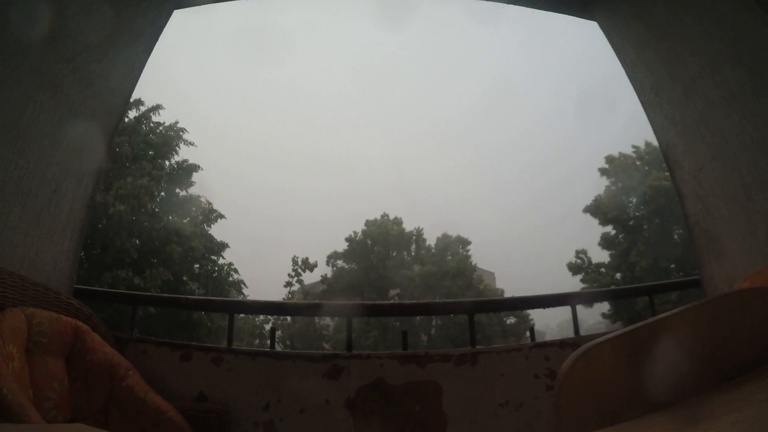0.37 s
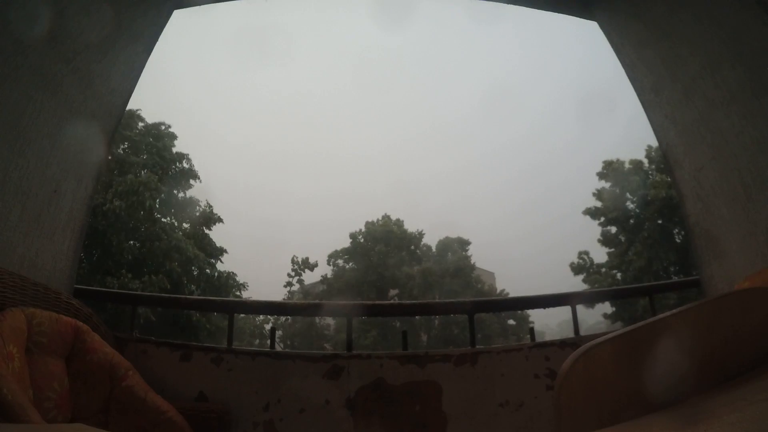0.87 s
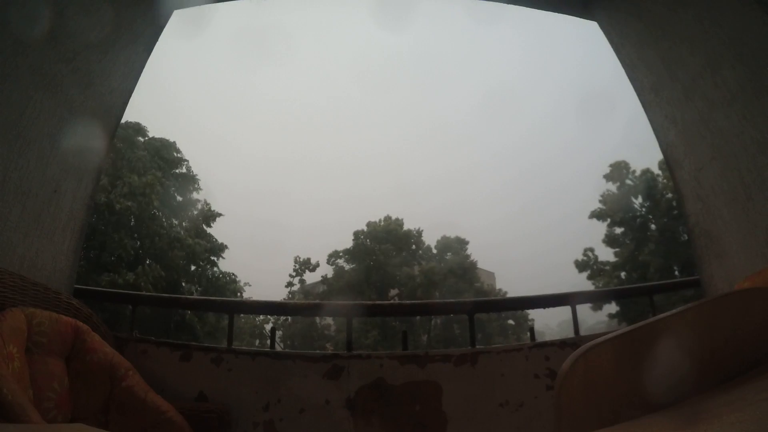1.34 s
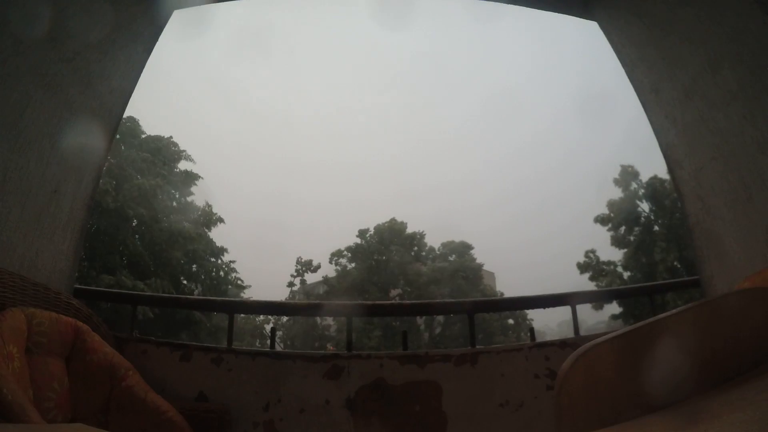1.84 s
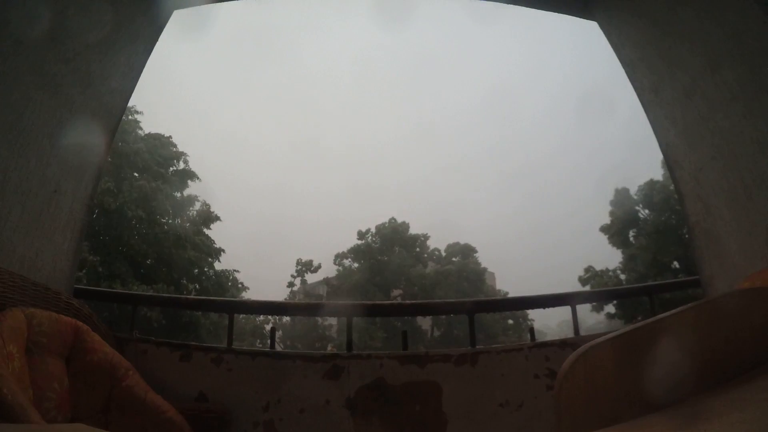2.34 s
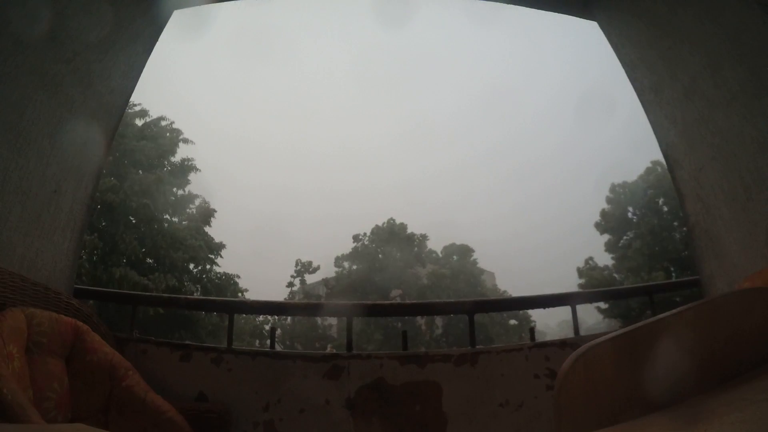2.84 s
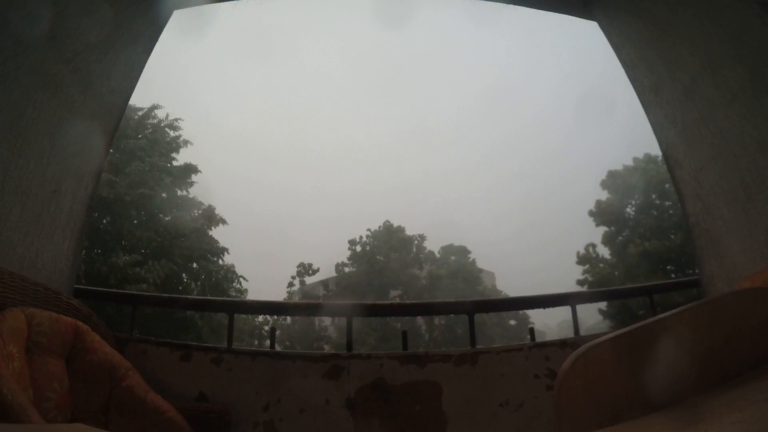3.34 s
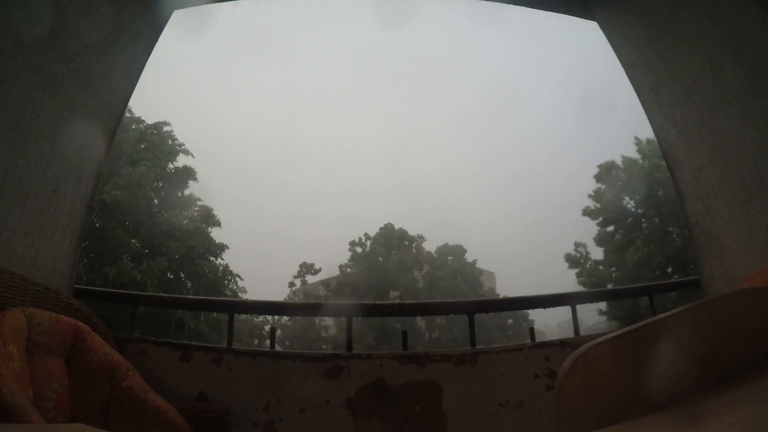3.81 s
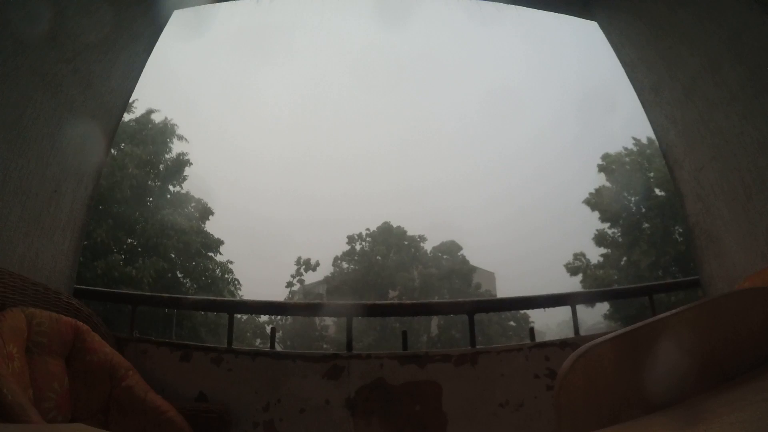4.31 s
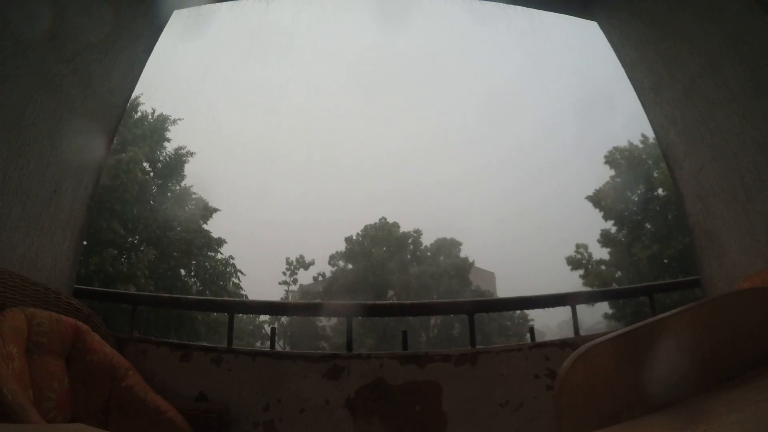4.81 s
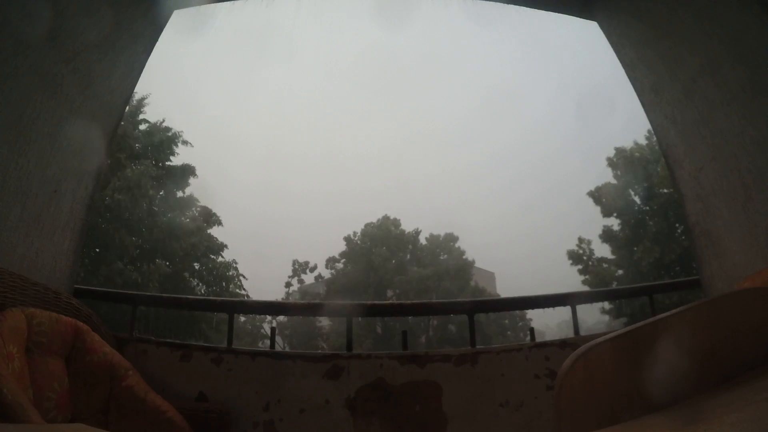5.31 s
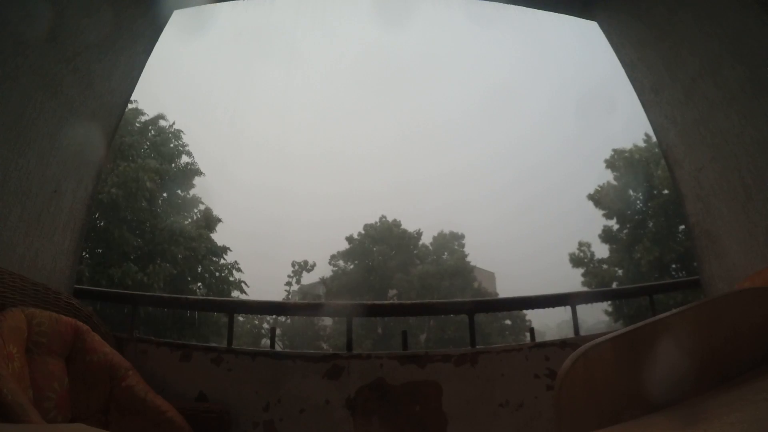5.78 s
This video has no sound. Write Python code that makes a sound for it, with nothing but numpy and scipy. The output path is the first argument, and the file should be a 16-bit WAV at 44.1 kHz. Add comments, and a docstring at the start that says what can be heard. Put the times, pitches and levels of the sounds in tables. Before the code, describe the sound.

Steady heavy rain pours beyond a covered balcony, boxy and muffled, over a low storm rumble with a wavering hum and a few close drips.

```python
"""Downpour from a covered balcony

Heavy rain and a storm rumble, heard by a single microphone inside a sealed case.
The rain is noise with uneven clicks for near drops; a few splashes are band-limited noise, plinks are short tones.
The rumble is low noise. The case's resonances and dips colour rain, splashes and rumble; wavering tones
at its low resonances swell now and then into a hum."""
import sys
import numpy as np
from scipy import signal
from scipy.fft import rfft, irfft
from scipy.io import wavfile
from scipy.ndimage import uniform_filter1d

SR = 44100
rng = np.random.default_rng(int(sys.argv[2]) if len(sys.argv) > 2 else 0)


def wav_out(sig):
    """Save sig, one row per channel (or a flat mono array), as 16-bit PCM at SR to the path in sys.argv[1]."""
    wavfile.write(sys.argv[1], SR, np.round(np.clip(np.atleast_2d(sig).T, -1, 1) * 32767).astype(np.int16))


def boost_factor(decibels):
    """Convert a level in decibels to a linear amplitude factor."""
    exponent = np.asarray(decibels, float) / 20
    return 10 ** exponent


N = 260631

# Spectrum of falling water before the case colours it, relative level: hz, density_db (dB per Hz)
RAIN_SPECTRUM = [(500, -6), (800, -15), (1200, -4.5), (1700, -7.5), (2300, -4.5), (3200, 2), (4800, -7.5),
                 (6000, -9.5), (7500, -9.5), (9000, -17.5), (11000, -20), (13000, -23), (15290, -26)]


def rms_one(x):
    """Scale to unit rms."""
    return x / np.sqrt(np.mean(x ** 2) + 1e-20)


def in_time(rows):
    """Columns of a curve table whose first column is time in seconds, one value a sample."""
    s, *columns = np.transpose(rows)
    return [np.interp(np.arange(N) / SR, s, c) for c in columns]


def drift(rate_hz):
    """Slow random wander of spread 1: noise through two equal poles, computed every 40 samples."""
    pole = np.exp(-80 * np.pi * rate_hz / SR)
    noise = rng.standard_normal(N // 40 + 2002)
    slow = signal.lfilter([1], [1, -2 * pole, pole * pole], noise)[2000:]  # drop the filter's start
    return np.interp(np.arange(N) / 40, np.arange(len(slow)), rms_one(slow))


def coloured(x, spectrum):
    """Give a flat signal the shape of a spectrum; 99 dB down outside its ends."""
    hz, db = np.transpose(spectrum)
    bins_hz = np.arange(N // 2 + 1) * SR / N + 1e-9
    shape = boost_factor(np.interp(np.log(bins_hz), np.log(hz), db, left=-99, right=-99))
    return irfft(rfft(x) * shape, N)


def tilted(x, hz, kind, db):
    """Raise or lower the low or high end of the spectrum by a curve."""
    end = signal.sosfiltfilt(signal.butter(2, hz, kind, fs=SR, output="sos"), x)
    return x + (boost_factor(db) - 1) * end


def through_case(x):
    """The sealed case around the microphone: a chain of peaking filters, one for each resonance or dip."""
    # Resonances above zero, dips below: hz, width_hz, gain_db
    resonances = [(48.8, 26, 3.5), (57.4, 5.6, -11), (78.6, 16, 7.5), (103.4, 13.5, -9.5), (130.6, 13, 6.5),
                  (184, 16, 7), (260.2, 49, 16.5), (293.6, 7.8, -5.5), (339.5, 9.3, 8.5), (407, 31, -5.5),
                  (562, 38, 8.5), (742, 22, 8), (880, 128, 10), (961, 27, 7), (1016, 48, -6),
                  (1318, 146, 10.5), (1394.3, 82, 12), (1552, 87, 5), (1840, 56, -4), (1998, 154, 7),
                  (2560, 70, 3.5), (3210, 220, -2), (4310, 320, 5), (5350, 390, 5), (6640, 1000, 7.5),
                  (7440, 560, -8.5), (11600, 590, 4)]
    for hz, width_hz, db in resonances:
        middle = -2 * np.cos(2 * np.pi * hz / SR)
        gain, half = boost_factor(db / 2), np.pi * width_hz / SR
        zeros = [1 + half * gain, middle, 1 - half * gain]
        poles = [1 + half / gain, middle, 1 - half / gain]
        x = signal.lfilter(zeros, poles, x)
    return x


def rain(rain_db, bright_db, body_db):
    """Near drops as uneven clicks over the smooth hiss of far ones; sheets of rain make it flutter."""
    drops_per_s = 6000  # around which the rate wanders
    sizes = boost_factor(4.4 * np.minimum(rng.exponential(1, N), 5)) * rng.choice([-1, 1], N)
    landed = rng.random(N) < drops_per_s * boost_factor(2.5 * drift(8.0)) / SR
    falling = rng.standard_normal(N) + boost_factor(-8.5) * rms_one(sizes * landed)
    fluttering = falling * boost_factor(0.35 * drift(9.0))
    sound = rms_one(through_case(coloured(fluttering, RAIN_SPECTRUM)))
    brightened = tilted(sound, 7300, "high", bright_db)
    return boost_factor(rain_db) * tilted(brightened, 1800, "low", body_db)


def rumble(rumble_db, deep_db):
    """The low roar of the storm: shaped noise whose deepest part rolls on its own."""
    # Spectrum before the case, relative level: hz, density_db (dB per Hz)
    roar_spectrum = [(15, -18), (25, 1), (40, 4.5), (60, 6), (100, -1.5), (200, -9), (300, 0), (420, -2),
                     (600, -15), (900, -29)]
    roar = rms_one(through_case(coloured(rng.standard_normal(N), roar_spectrum)))
    return boost_factor(rumble_db) * tilted(roar, 65, "low", deep_db)


def hum():
    """Low resonances of the case as tones with unsteady phase and level, which swells lift and detune."""
    # Hum between swells, rms before flutter: pitch_hz, level_db
    resting = [(48, -63), (79, -57), (268, -54), (340, -64.5)]
    # Swells, lowest resonance first, timed between half-height points: start_s, length_s, level_db, pitch_hz
    swells = [(0.02, 0.38, -50, 47), (1.0, 0.11, -53, 48.03), (1.5, 0.32, -49.5, 48.7),
              (3.62, 0.45, -52, 49.8), (4.42, 0.15, -51.5, 46), (4.72, 0.15, -52, 48.2),
              (5.33, 0.1, -51, 45.9), (5.521, 0.21, -52, 46), (0.01, 0.084, -45, 76.8),
              (0.14, 0.13, -47, 80.3), (0.547, 0.08, -48, 75.8), (0.845, 0.099, -48, 77.4),
              (1.05, 0.11, -44.5, 78.6), (1.23, 0.08, -52, 77), (1.4, 0.066, -49, 78),
              (1.69, 0.61, -48.5, 78.6), (2.4, 0.26, -46, 79.2), (2.98, 0.56, -48, 79.9),
              (3.66, 0.15, -48, 77.4), (3.88, 0.3, -47.5, 78.7), (4.49, 0.079, -47, 78.8),
              (4.64, 0.21, -48.5, 77.3), (4.95, 0.23, -48.5, 80.4), (5.401, 0.18, -48, 78.7),
              (0.017, 0.083, -46.5, 269.5), (0.21, 0.11, -47, 267.5), (0.42, 0.11, -46.5, 269),
              (0.567, 0.11, -42, 268.3), (0.809, 0.055, -47.5, 271), (1.009, 0.21, -42.5, 269.2),
              (1.362, 0.12, -44.5, 273), (1.59, 0.17, -44.5, 263), (1.948, 0.11, -47.5, 266),
              (2.285, 0.15, -48.5, 269), (2.483, 0.19, -48.5, 268), (2.825, 0.17, -45, 265.3),
              (3.06, 0.36, -45, 269.6), (3.489, 0.19, -46.5, 264.8), (3.771, 0.2, -48, 270),
              (4.111, 0.14, -45, 270), (4.587, 0.13, -43.5, 268.4), (4.84, 0.18, -48, 263),
              (5.052, 0.084, -42.5, 263.7), (5.232, 0.07, -41.5, 263.3), (5.324, 0.078, -45, 269.6),
              (5.486, 0.18, -44, 274), (5.719, 0.091, -38.5, 269.7), (5.839, 0.098, -39.5, 270.5),
              (0.005, 0.063, -52, 342), (0.33, 0.25, -51.5, 340), (3.85, 0.11, -52.5, 339),
              (5.2, 0.13, -47.5, 342)]
    edge_cycles = 10.4  # full rise or fall of a swell
    # spread of phase (radians) and level (dB) at 100 Hz, both growing with the root of pitch
    wobble_rad, flutter_db, cycles_per_wobble = 0.31, 0.1, 26
    out, t = np.zeros(N), np.arange(N) / SR
    for rest_hz, rest_db in resting:
        height = np.full(N, boost_factor(rest_db))
        pulled = height * rest_hz  # pitch weighted by height
        for s, length, db, hz in swells:
            if abs(np.log(hz / rest_hz)) < .11:  # the swell belongs to this resonance
                ramp = np.minimum(t - s, s + length - t) * hz / edge_cycles + .5
                rise = np.sin(np.pi / 2 * np.clip(ramp, 0, 1)) ** 2
                lift = (boost_factor(db) - boost_factor(rest_db)) * rise
                height, pulled = height + lift, pulled + lift * hz
        shaky, rate_hz = np.sqrt(rest_hz / 100), rest_hz / cycles_per_wobble
        phase = 2 * np.pi * np.cumsum(pulled / height) / SR + wobble_rad * shaky * drift(rate_hz)
        flutter = boost_factor(flutter_db * shaky * drift(rate_hz))
        out += np.sqrt(2) * height * flutter * np.sin(phase)
    return out


def splashes():
    """Nearby splashes: lumpy noise coloured like the rain, each swelling and dying within its own band."""
    # Level is rms before the swell and decay: start_s, level_db, low_hz, high_hz, t60_s
    nearby = [(.25, -41, 2800, 14000, .17), (.312, -46.5, 2000, 14000, .15), (1.555, -44, 3000, 14500, .9),
              (1.73, -48, 3500, 7000, .1), (4.398, -44, 2400, 4000, .17), (5.139, -42, 2500, 8000, .3),
              (5.358, -41, 2300, 4400, .2)]
    swell_share = 0.042  # time constant of the swell as a share of the t60
    out, t = np.zeros(N), np.arange(SR // 2) / SR
    lumps = boost_factor(2.0 * rms_one(uniform_filter1d(rng.standard_normal(N), size=90)))
    spatter = lumps * through_case(coloured(rng.standard_normal(N), RAIN_SPECTRUM))
    for s, db, low_hz, high_hz, t60 in nearby:
        at = round(s * SR)
        band = signal.butter(2, [low_hz, high_hz], "band", fs=SR, output="sos")
        spray = rms_one(signal.sosfilt(band, spatter[at:at + len(t)]))
        swell = 1 - np.exp(-t / (swell_share * t60))
        out[at:at + len(t)] += spray * swell * boost_factor(db - 60 * t / t60)
    return out


def plinks():
    """Single large drops: a trapped bubble rings briefly, rising in pitch."""
    # Peak is before onset and decay, pitch is at the start: start_s, peak_db, pitch_hz
    large_drops = [(1.577, -41, 3320), (4.403, -39, 3000), (4.416, -38.5, 2899), (4.694, -38.5, 3325),
                   (5.142, -37.5, 2583), (5.148, -35, 3600), (5.152, -37, 3375), (5.160, -40, 4170),
                   (5.179, -42, 3100), (5.355, -37, 4200), (5.364, -31, 2843), (5.364, -36, 4020),
                   (5.369, -37.5, 2710), (5.377, -38, 3375), (5.387, -45, 3350)]
    t60_s = 0.017
    out, t = np.zeros(N), np.arange(SR // 25) / SR
    for s, db, hz in large_drops:
        onset = 1 - np.exp(-t / 0.00043)
        ring = np.sin(2 * np.pi * hz * t * (1 + 5.8 * t)) * onset
        at = round(s * SR)
        out[at:at + len(t)] += ring * boost_factor(db - 60 * t / t60_s)
    return out


def scene():
    """One microphone hears everything, so both channels are alike."""
    # The downpour, levels before the tilts below: time_s, rain_db, rumble_db
    storm = [(0.0, -48.5, -48), (0.6, -48.5, -48.5), (0.9, -49, -48), (1.25, -46, -48), (2.1, -46.5, -50),
             (2.4, -46, -49), (2.7, -46.7, -49), (3.3, -45, -47), (3.9, -45.5, -48), (4.3, -46.5, -48),
             (4.8, -46, -46), (5.4, -47, -45.5), (5.91, -46, -46)]
    rain_db, rumble_db = in_time(storm)
    harder, louder = rain_db + 46.5, rumble_db + 47.5  # dB above the usual levels
    # treble takes half of the rain's swing; body moves a little against it and follows the rumble
    treble_share, body_share, body_with_rumble = 0.5, -0.3, 0.3
    bright_db = (treble_share - 1) * harder
    body_db = (body_share - 1) * harder + body_with_rumble * louder
    # the deepest roar is lifted, moves a little against the rumble's swing and rolls apart from it
    lift_db, deep_share, roll_db = 5.5, -0.3, 2
    deep_db = lift_db + (deep_share - 1) * louder + roll_db * drift(1.9)
    water = rain(rain_db, bright_db, body_db) + splashes() + plinks()
    return np.tile(water + rumble(rumble_db, deep_db) + hum(), (2, 1))


def band_limit(x):
    """A steep low-pass at the top of the band."""
    return signal.sosfilt(signal.butter(12, 15360, fs=SR, output="sos"), x)


def record(dry):
    """Converters: each channel sits off zero, and low noise moves the two in opposite directions."""
    # Steady offset of the left and right converter: offset (full scale = 1)
    offset = [.0195, .00015]
    drift_db, drift_hz = -67.5, 85  # rms level and upper edge of the noise
    low_pass = signal.butter(5, drift_hz, fs=SR, output="sos")
    wander = boost_factor(drift_db) * rms_one(signal.sosfilt(low_pass, rng.standard_normal(N)))
    mix = dry + np.c_[offset] + wander * [[1], [-1]]
    return band_limit(mix)


dry = scene()
out = record(dry)
wav_out(out)
```